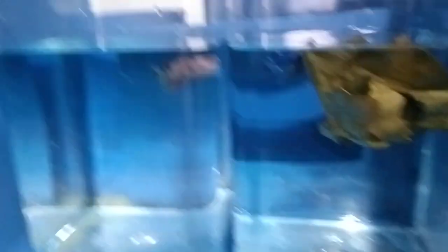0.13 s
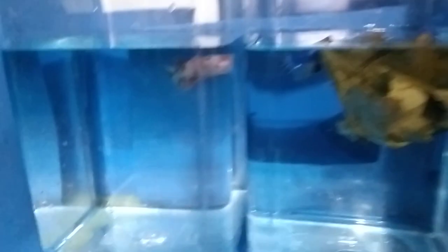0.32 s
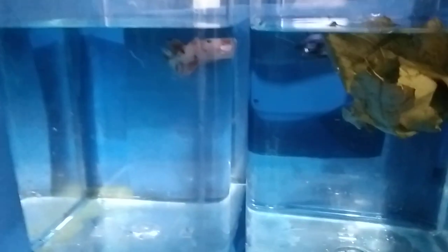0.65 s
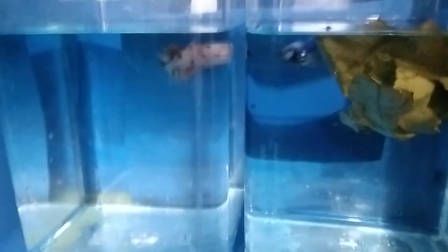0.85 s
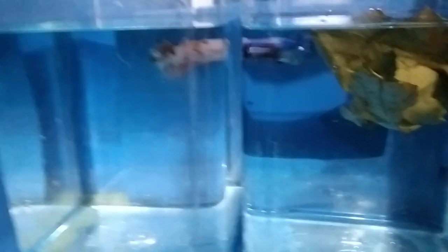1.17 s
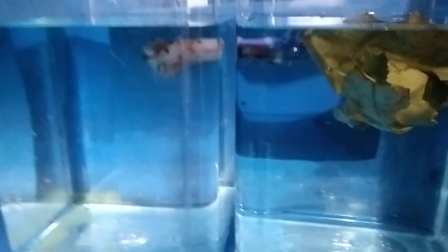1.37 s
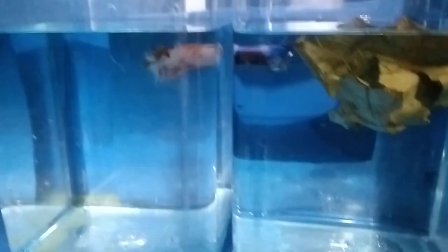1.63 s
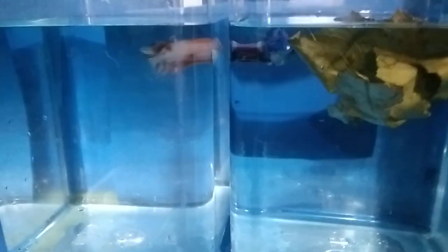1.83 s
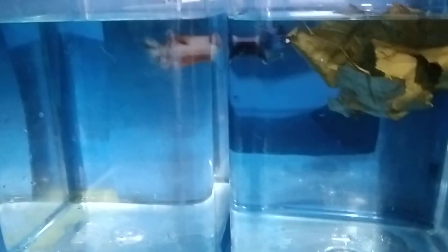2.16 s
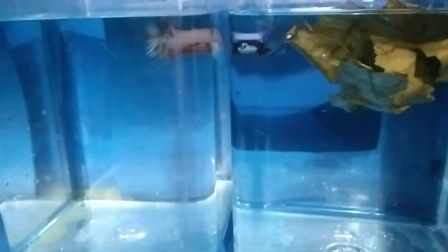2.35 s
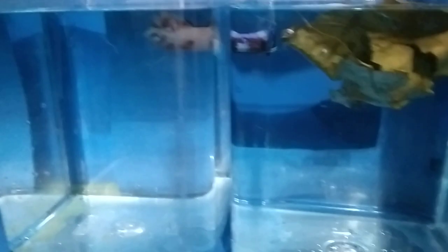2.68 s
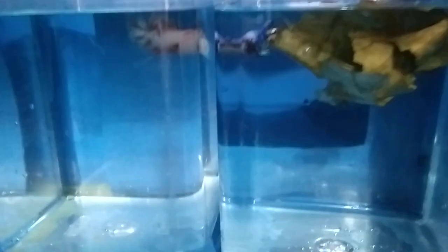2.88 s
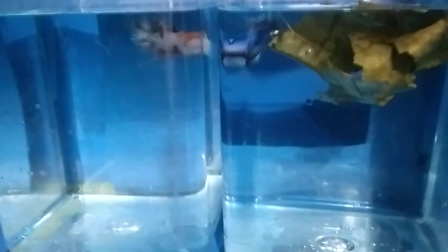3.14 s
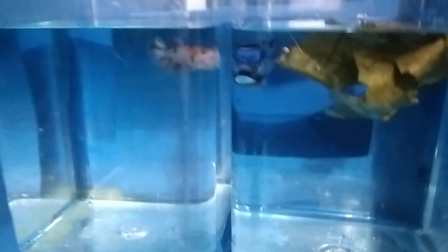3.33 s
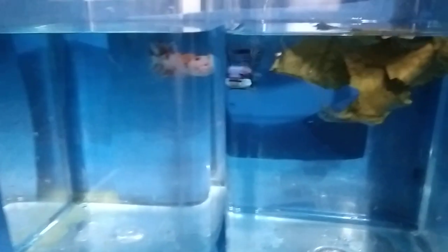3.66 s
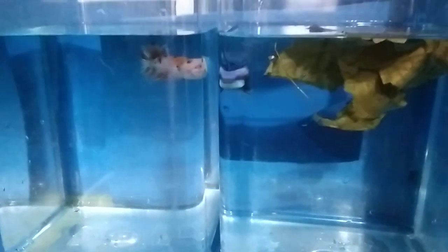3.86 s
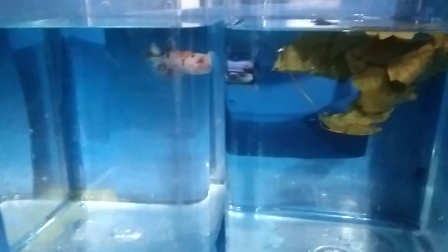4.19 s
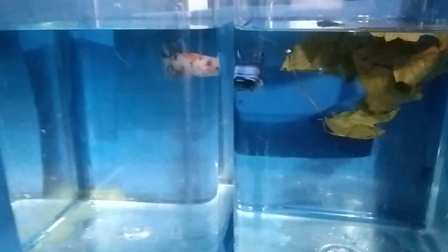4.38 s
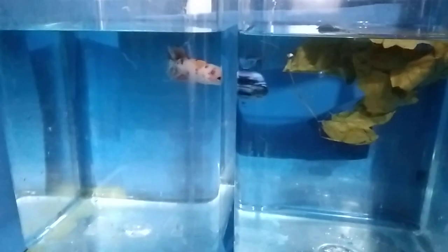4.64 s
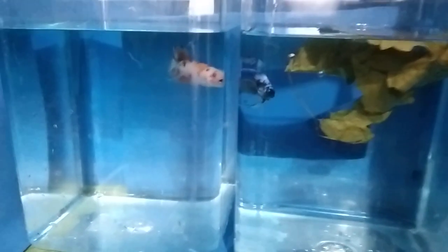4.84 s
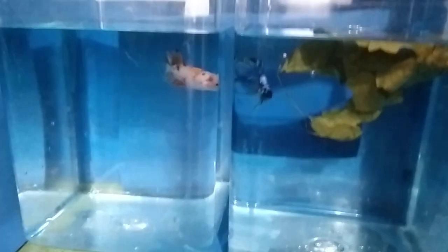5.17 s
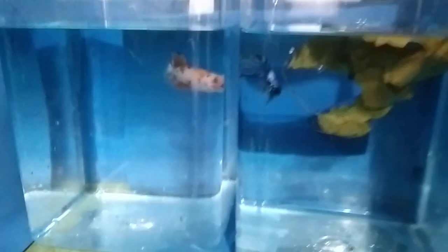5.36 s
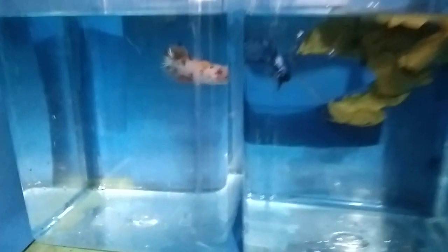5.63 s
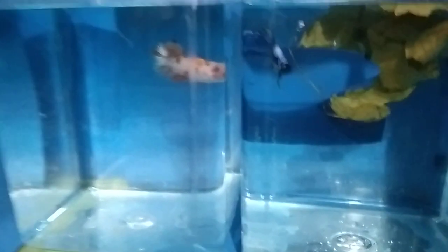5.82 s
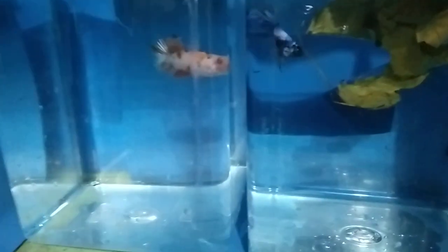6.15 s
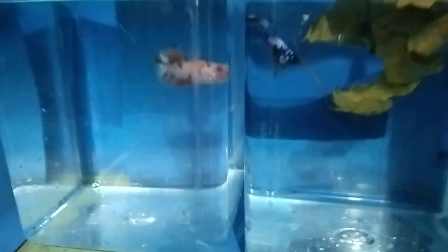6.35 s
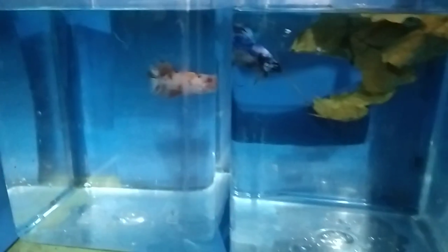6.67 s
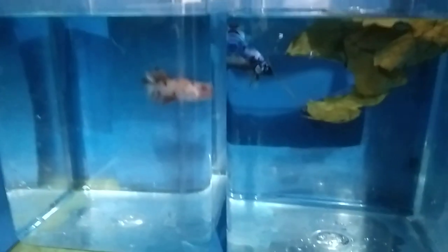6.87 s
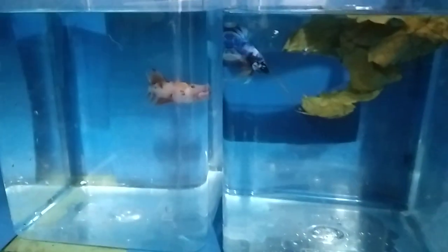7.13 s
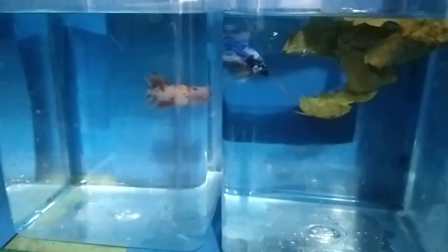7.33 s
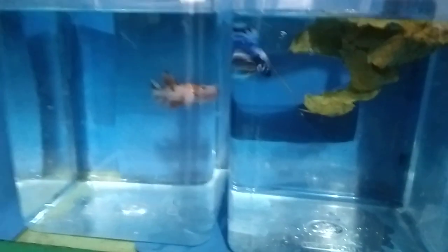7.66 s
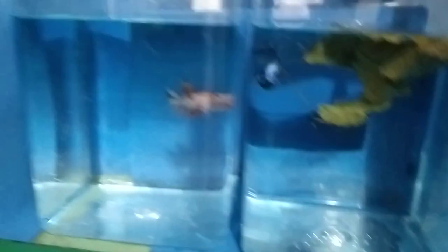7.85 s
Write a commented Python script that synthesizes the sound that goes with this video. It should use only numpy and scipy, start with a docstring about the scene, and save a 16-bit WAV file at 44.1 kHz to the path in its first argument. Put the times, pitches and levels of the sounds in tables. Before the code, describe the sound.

A quiet close phone pickup of a leaf and a water-filled plastic tank indoors. Soft hollow knocks and papery swishes gather between two and three seconds, followed by small isolated snaps, one stronger low thump after six seconds and a sharp burst of leaf crackles near the end. Underneath are gliding mid-pitched warbles with little blips, uneven airy hiss, very low room noise, and a hum only in the first half.

```python
"""Dry leaf in a small fish tank

A dry leaf is pushed into the water of a small plastic tank, close to a phone in a small room.
Leaf: cracks with short rings, swishes of band noise. Tank: knocks ring its low modes.
Background: gliding noise bands, short blips, narrow noise bursts, a thin shimmering hiss.
Two wavering low tones hum until about halfway; quiet low room noise lies beneath."""
import sys
import numpy as np
from scipy import signal
from scipy.fft import rfft, irfft
from scipy.io import wavfile
from scipy.ndimage import uniform_filter1d, map_coordinates

SR = 44100
rng = np.random.default_rng(int(sys.argv[2]) if len(sys.argv) > 2 else 0)


def wav_record(signal):
    """Record a signal, one row per channel, as 16-bit PCM in the file named by sys.argv[1]."""
    frames = np.transpose(np.atleast_2d(signal))
    bounded = np.clip(frames, -1, 1)
    # unit amplitude maps onto the largest positive 16-bit level
    quanta = np.round(bounded * 32767).astype(np.int16)
    wavfile.write(sys.argv[1], SR, quanta)


N = 353152
T = np.arange(N) / SR


def undb(db):
    """Decibels to gain."""
    return 10 ** (np.asarray(db) / 20)


def unit(x):
    """Scale to rms 1."""
    return x / np.sqrt(np.mean(x ** 2) + 1e-20)


def curves(table):
    """Each column of a table, joined by straight lines in time."""
    time_s, *columns = np.transpose(table)
    return [np.interp(T, time_s, column) for column in columns]


def colour(x, points):
    """Filter by a spectrum of (frequency [Hz], level [dB]) points, linear in log frequency."""
    hz, db = np.transpose(points)
    f = np.fft.rfftfreq(len(x), 1 / SR) + 1  # +1 avoids log(0)
    gain = undb(np.interp(np.log(f), np.log(hz), db))
    return irfft(rfft(x) * gain, len(x))


def band(x, hz, width_hz, order=2):
    """Causal band-pass of a given width around a geometric centre."""
    low = np.sqrt(hz ** 2 + (width_hz / 2) ** 2) - width_hz / 2
    edges = [low, min(low + width_hz, SR / 2 - 1000)]
    return signal.sosfilt(signal.butter(order, edges, "bandpass", fs=SR, output="sos"), x)


def walk(rate_hz):
    """Smooth random wander, rms 1, with rate_hz knots per second."""
    knots = rng.standard_normal(int(N / SR * rate_hz) + 2)
    wander = np.interp(T * rate_hz, np.arange(len(knots)), knots)
    return unit(uniform_filter1d(wander, int(SR / rate_hz / 2)))


def add(out, time_s, x):
    """Mix a sound in at a time."""
    i = max(int(time_s * SR), 0)
    out[i:i + len(x)] += x[:N - i]


def fade(t, t60_s):
    """Exponential decay, 60 dB in t60_s."""
    return np.exp(-np.log(1000) * t / t60_s)


# leaf snaps: (time [s], relative level [dB], ring [Hz])
CRACKLES = [(2.054, -22.5, 4800), (2.074, -24, 7550), (2.631, -31, 7100), (2.8455, -32.5, 7340),
            (2.96, -28.5, 7700), (4.1005, -36.5, 4250), (5.0903, -30.5, 3840), (5.853, -29, 4570),
            (6.51, -31.5, 6840), (6.636, -27.5, 6340), (6.864, -31, 6000), (7.3345, -25.5, 7000),
            (7.5335, -14, 7800), (7.5724, -12, 4440), (7.601, -15.5, 7600), (7.609, -20, 7700),
            (7.613, -20.5, 4220), (7.637, -26, 8300), (7.684, -26.5, 4250), (7.9387, -32.5, 7540)]
# leaf colour: (frequency [Hz], level [dB])
LEAF_COLOUR = [(1500, -19), (2800, -4.5), (4500, 0.5), (5700, -5.5), (7800, 3.5), (10000, -6),
               (15500, -16.5)]
CRACKLE_RING_DB = -1  # against the crack
CRACKLE_CUT_HZ = 1150  # the leaf is too small to radiate bass


def crackles():
    """Each leaf snap is a very short noise crack with a narrow-band ring and a little room decay."""
    out, t = np.zeros(N), np.arange(SR // 4) / SR
    for time_s, db, hz in CRACKLES:
        snap, air, buzz = rng.standard_normal((3, len(t)))
        crack = unit(colour(snap, LEAF_COLOUR) * fade(t, t60_s=0.007))
        ring = unit(band(buzz * fade(t, t60_s=0.012), hz, width_hz=1200))
        room = unit(colour(air, LEAF_COLOUR) * fade(t, t60_s=0.12))
        x = crack + undb(CRACKLE_RING_DB) * ring + undb(-1.0) * room
        add(out, time_s, unit(x) * undb(db - 26.0))
    return signal.sosfilt(signal.butter(4, CRACKLE_CUT_HZ, "highpass", fs=SR, output="sos"), out)


# leaf scrapes: (time [s], rise [s], centre [Hz], level [dB])
SWISHES = [(0.57, 0.07, 295, -65.5), (2.022, 0.051, 4980, -31.5), (2.05, 0.027, 910, -42.5),
           (2.157, 0.01, 4430, -41.5), (2.94, 0.024, 1240, -41.5), (2.939, 0.02, 4970, -42),
           (4.119, 0.0025, 1900, -45.5), (5.832, 0.018, 1970, -42), (7.313, 0.013, 4440, -42.5)]
SWISH_T60_S, SWISH_DAMPING = 0.41, 0.54  # t60 at 1 kHz; t60 falls with this power of the centre


def swishes():
    """The leaf scrapes as broad noise bursts; higher centres die sooner."""
    out = np.zeros(N)
    for time_s, rise_s, hz, db in SWISHES:
        t60_s = SWISH_T60_S * (1000 / hz) ** SWISH_DAMPING
        add(out, time_s, burst(hz, 1.13 * hz, rise_s, t60_s) * undb(db))
    return out


def burst(hz, width_hz, rise_s, t60_s):
    """Half a second of gritty, ragged band noise that swells and dies."""
    t = np.arange(SR // 2) / SR
    swell = np.minimum(t / rise_s, 1) ** 2
    decay = fade(np.maximum(t - rise_s, 0), t60_s)
    noise = ragged(grit(len(t), spread_db=0.5))
    return unit(band(noise, hz, width_hz, order=3)) * swell * decay


def grit(size, spread_db):
    """Noise whose strength steps randomly every 20 samples."""
    strength = np.repeat(rng.standard_normal(size // 20 + 1), 20)[:size]
    return unit(rng.standard_normal(size) * undb(spread_db * strength))


RAGGED_DB, RAGGED_STEP_HZ = 6, 108.76  # spread and spacing of the resonances


def ragged(x):
    """Give a noise burst its own random cluster of narrow resonances."""
    f = np.fft.rfftfreq(len(x), 1 / SR)
    peaks = rng.standard_normal(size=512)
    gain_db = RAGGED_DB * np.interp(f / RAGGED_STEP_HZ, np.arange(len(peaks)), peaks)
    return irfft(rfft(x) * undb(gain_db), len(x))


# blows on the tank: (time [s], relative level [dB])
KNOCKS = [(1.411, -37), (1.546, -38), (2.096, -31), (2.38, -33.5), (2.845, -29.5), (2.864, -31.5),
          (2.94, -28.5), (2.965, -31), (3.012, -36.5), (3.416, -49.5), (4.136, -52), (5.091, -44.5),
          (5.864, -44.5), (6.151, -34), (6.185, -23)]
# modes of the water-filled tank: (nominal frequency [Hz], level before tilt [dB], t60 [s])
TANK_MODES = [(129.7, -4, 0.69), (198.6, 5.5, 0.28), (261, 12, 0.2), (296.2, 3, 0.32), (469.5, -3, 0.26)]
RATTLE_DB, RATTLE_SLOPE = -7.5, 0.51  # at a table level of -37.5 dB; dB lost per dB of a harder blow


def knocks():
    """Soft blows ring the tank's low modes; the rim rattles and the room holds the boom."""
    out, t = np.zeros(N), np.arange(SR // 2) / SR
    hz, table_db, t60_s = np.transpose(TANK_MODES)[:, :, None]
    for time_s, db in KNOCKS:
        detune, phase = rng.standard_normal((2, len(TANK_MODES), 1))
        # heavier blows favour the lower modes
        mode_db = table_db + 0.038 * (db + 20) * np.log2(250 / hz)
        tones = np.sin(2 * np.pi * hz * (1 + 0.01 * detune) * t + phase)
        body = np.sum(undb(mode_db) * tones * fade(t, t60_s), axis=0)
        boom = band(rng.standard_normal(len(t)), 186, 257, order=3) * fade(t, t60_s=0.33)
        rattle = band(rng.standard_normal(len(t)), 808, 300) * fade(t, t60_s=0.36)
        rattle_db = RATTLE_DB - RATTLE_SLOPE * (db + 37.5)
        x = unit(body) + undb(-4.0) * unit(boom) + undb(rattle_db) * unit(rattle)
        attack = np.minimum(t / 0.0028, 1)
        add(out, time_s, x * attack * undb(db - 20))
    return signal.sosfilt(signal.butter(2, 62, "highpass", fs=SR, output="sos"), out)


# narrow noise bursts: (time [s], centre [Hz], level [dB])
NOISE_PATCHES = [(0.174, 6770, -50), (0.248, 5440, -52), (0.248, 1770, -61.5), (0.438, 2140, -61),
                 (0.508, 7220, -56), (0.695, 1400, -56.5), (1.02, 2950, -52), (1.138, 7600, -51),
                 (1.181, 3900, -52.5), (1.182, 1480, -59), (1.335, 8450, -52.5), (1.36, 2450, -52.5),
                 (1.457, 7360, -48.5), (1.631, 7400, -46.5), (2.52, 2100, -56.5), (2.63, 1690, -47.5),
                 (2.695, 4070, -51.5), (3.275, 2060, -49), (3.593, 8280, -53.5), (3.732, 5280, -52),
                 (3.834, 1800, -49), (3.919, 4150, -53.5), (3.994, 7880, -47.5), (4.028, 3830, -53),
                 (4.303, 8150, -58.5), (4.4, 8170, -52), (4.53, 1980, -47.5), (4.854, 7100, -43.5),
                 (5.192, 7300, -46), (5.318, 7300, -47.5), (5.468, 7160, -46), (5.659, 2040, -65),
                 (6.711, 1100, -58.5), (6.767, 6300, -45), (6.93, 2070, -47.5)]
PATCH_RISE_CYCLES = 26  # lower patches swell more slowly
PATCH_T60_S, PATCH_WIDTH = 0.34, 0.27  # width as a share of the centre


def noise_patches():
    """Narrow noise bursts that open quickly and die."""
    out = np.zeros(N)
    for time_s, hz, db in NOISE_PATCHES:
        x = burst(hz, PATCH_WIDTH * hz, PATCH_RISE_CYCLES / hz, PATCH_T60_S)
        add(out, time_s, x * undb(db))
    return out


# gliding bands: (time [s], start pitch [Hz], rise as a share of it [1/s], relative level [dB])
WARBLES = [(0, 946, -0.3, -59.5), (.246, 974, 0.24, -56.5), (.683, 1024, -.5, -51), (.944, 800, 1.5, -57),
           (1.25, 849, 1.5, -57.5), (1.729, 649, 0.3, -56), (1.909, 779, -0.3, -58.5), (2.337, 896, 2, -59),
           (2.62, 734, 0.47, -54.5), (3.168, 758, 0, -55.5), (3.621, 753, 1.4, -50.5),
           (3.786, 643, 3, -50.5), (3.98, 756, 0.76, -54), (4.272, 1027, 1.24, -56),
           (4.522, 924, 1.4, -55.5), (4.712, 774, 0, -53.5), (5.15, 641, 2.5, -50.5),
           (5.371, 861, -0.14, -55), (5.573, 767, 0.73, -51.5), (6.012, 679, -0.3, -56.5),
           (6.431, 771, 0.7, -59.5), (6.66, 587, 4, -53.5), (6.839, 796, 0.5, -50), (7.1, 710, 0.24, -57),
           (7.715, 753, 0.4, -56), (7.885, 843, -0.3, -56.5)]
# half widths as a share of the pitch; levels against the main band
WARBLE_WIDTH = 0.12
WARBLE_CORE_WIDTH, WARBLE_CORE_DB = 0.023, -0.5
WARBLE_SKIRT_WIDTH, WARBLE_SKIRT_DB = 0.31, -13.5
WARBLE_GAP_SHARE, WARBLE_LONGEST_S = 0.8, 0.28  # nominal length: share of the wait for the next, and cap
WARBLE_THROB_DB, WARBLE_THROB_HZ = 0.5, 24.16
WARBLE_BLIP_DB, WARBLE_BLIP_SPREAD = 2.5, 0.098  # level against the warble; log spread of pitch
FLOOR_DB, FLOOR_HZ, FLOOR_WIDTH_HZ = -66.5, 796, 173  # constant faint noise band, before the throb


def warbles():
    """Gliding narrow noise bands with a tonal core, a soft broad skirt and short blips."""
    floor = unit(band(rng.standard_normal(N), FLOOR_HZ, FLOOR_WIDTH_HZ, order=4))
    out = undb(FLOOR_DB) * floor
    t = np.arange(SR // 2) / SR
    waits_s = np.diff([row[0] for row in WARBLES], append=np.inf)
    for (time_s, hz, rise, db), wait_s in zip(WARBLES, waits_s):
        length_s = min(WARBLE_GAP_SHARE * wait_s, WARBLE_LONGEST_S)
        swell = np.interp(t / length_s, [0, .08, .55, 1, 1.4], [0.079, 0.94, 0.63, 0.37, 0])
        track_hz = hz * (1 + rise * t)
        main = sliding(track_hz, WARBLE_WIDTH * hz)
        core = sliding(track_hz, WARBLE_CORE_WIDTH * hz)
        skirt = sliding(1.2 * track_hz, WARBLE_SKIRT_WIDTH * hz)
        x = main + undb(WARBLE_CORE_DB) * core + undb(WARBLE_SKIRT_DB) * skirt
        add(out, time_s, unit(x) * swell * undb(db))
        delays_s = rng.random(size=5) * length_s
        for delay_s, detune in zip(delays_s, rng.standard_normal(size=5)):
            x = blip(hz * (1 + rise * delay_s) * np.exp(WARBLE_BLIP_SPREAD * detune))
            add(out, min(time_s + delay_s, T[-1]) - len(x) / SR / 2, x * undb(db + WARBLE_BLIP_DB))
    return out * undb(WARBLE_THROB_DB * walk(WARBLE_THROB_HZ))


def sliding(hz, half_width_hz):
    """A narrow band of noise, rms 1, whose centre follows a pitch track."""
    phase = 2 * np.pi * np.cumsum(hz) / SR
    lowpass = signal.butter(4, half_width_hz, fs=SR, output="sos")
    noise = signal.sosfilt(lowpass, rng.standard_normal((2, 2 * len(hz))))
    a, b = noise[:, len(hz):]  # drop the filter's start-up
    return unit(a * np.cos(phase) + b * np.sin(phase))


def blip(hz):
    """A tenth of a second with a nearly pure tone that swells at its middle and rises a little."""
    t = np.arange(-SR // 20, SR // 20) / SR
    tone = np.sin(2 * np.pi * np.cumsum(hz * (1 + 1.44 * t)) / SR)
    return tone * np.exp(-(t / 0.011) ** 2)


# clear tonal blips: (time [s], relative level [dB])
CLEAR_BLIPS = [(1.52, -46), (1.77, -42), (2.28, -45), (2.77, -44.5), (3.21, -44), (5.82, -44), (7.15, -48),
               (7.63, -46), (7.74, -48)]
CLEAR_BLIP_HZ = 753  # mean pitch


def clear_blips():
    """A few clear short tonal blips of nearly equal pitch."""
    out = np.zeros(N)
    for time_s, db in CLEAR_BLIPS:
        x = blip(CLEAR_BLIP_HZ * (1 + 0.017 * rng.standard_normal()))
        add(out, time_s - len(x) / SR / 2, x * undb(db + 1))
    return out


# middle range: (time [s], relative level [dB])
HISS_MIDDLE = [(0, -87), (.55, -87), (.8, -59.5), (.97, -77), (1.6, -66), (1.88, -53), (2, -70),
               (2.17, -55), (2.36, -63), (2.48, -76), (2.75, -68.5), (3.08, -55.5), (3.24, -81),
               (3.43, -59), (3.72, -79.5), (4.48, -81.5), (4.76, -77.5), (4.9, -57.5), (5.25, -88),
               (5.38, -54.5), (5.8, -91), (6.1, -62), (6.52, -59), (6.72, -77), (7, -54.5), (7.22, -87),
               (7.36, -60.5), (7.61, -57.5), (7.85, -73.5), (8, -54)]
# treble: (time [s], relative level [dB])
HISS_TREBLE = [(0, -64), (.13, -80), (.44, -84), (.65, -57), (.97, -72.5), (1.25, -67.5), (1.45, -66.5),
               (1.66, -58.5), (1.89, -51), (1.98, -58.5), (2.12, -54), (2.35, -55.5), (2.5, -66.5),
               (2.72, -55.5), (2.82, -67), (2.88, -58.5), (3.12, -57.5), (3.25, -71.5), (3.45, -54),
               (3.72, -80), (3.97, -82), (4.11, -51.5), (4.29, -88.5), (4.46, -64), (5.04, -56.5),
               (5.2, -59), (5.58, -64), (5.8, -79), (5.88, -51.5), (6.04, -70), (6.18, -50.5), (6.6, -55),
               (6.95, -55), (7.15, -56.5), (7.45, -56.5), (7.682, -52.5), (7.82, -61), (8, -51)]
# brightness: (time [s], gain of the top hiss, half of it for the upper hiss [dB])
HISS_BRIGHTNESS = [(.65, 1), (1.35, 6.5), (1.9, -1.5), (2.45, 3.5), (2.9, 7), (3.3, 3), (3.85, -9),
                   (4.7, 8.5), (5, -0.5), (5.25, -2), (5.6, 4.5), (6.4, -11), (6.601, 1), (7.25, 0.5),
                   (8, -2)]
# colour of the upper and top hiss: (frequency [Hz], level [dB])
HISS_COLOUR = [(7800, 1), (15500, -19)]
HISS_DB = -0.5
UPPER_HISS_DB, TOP_HISS_DB = -1, -8  # against the lower treble, before brightness
CRACKLING_DB, CRACKLING_HZ = 2.3, 259  # fast unevenness of the treble
SURGE_DB, SURGE_HZ = 2.16, 45.56  # slower unevenness of the whole hiss


def hiss():
    """Shimmering noise in four ranges that surge, brighten and fall nearly silent."""
    noise = shimmer()
    coloured = colour(noise, HISS_COLOUR)
    middle = hiss_range(noise, 1980, 1500)
    lower_treble = hiss_range(noise, 4200, 3100)
    upper_hiss = hiss_range(coloured, 7600, 3600)
    top_hiss = hiss_range(coloured, 12300, 6300)
    middle_db, = curves(HISS_MIDDLE)
    treble_db, = curves(HISS_TREBLE)
    bright_db, = curves(HISS_BRIGHTNESS)
    treble = lower_treble + undb(UPPER_HISS_DB + bright_db / 2) * upper_hiss
    treble = treble + undb(TOP_HISS_DB + bright_db) * top_hiss
    crackling = unit(undb(CRACKLING_DB * walk(CRACKLING_HZ)))
    surge = undb(HISS_DB + SURGE_DB * walk(SURGE_HZ))
    return (undb(middle_db) * middle + undb(treble_db) * treble * crackling) * surge


def hiss_range(x, hz, width_hz):
    """One band with its slow level evened out so that a curve can set it."""
    x = band(x, hz, width_hz, order=5)
    return x / np.sqrt(uniform_filter1d(x ** 2, size=5000) + 1e-12)


SHIMMER_DB, SHIMMER_FALL = 7, 0.3  # spread at 4 kHz; power by which it shrinks above 1.5 kHz
SHIMMER_STEP_HZ, SHIMMER_STEP_S = 260, 0.05  # spacing of the random gains


def shimmer():
    """Noise whose narrow resonances fade in and out at random, less deeply toward the treble."""
    f, t, z = signal.stft(rng.standard_normal(N), SR, nperseg=1024)
    rows, cols = np.meshgrid(f / SHIMMER_STEP_HZ, t / SHIMMER_STEP_S, indexing="ij")
    field = map_coordinates(rng.standard_normal(size=(128, 256)), [rows, cols], order=1)
    depth_db = SHIMMER_DB * (4000 / np.maximum(f, 1500)) ** SHIMMER_FALL
    return signal.istft(z * undb(depth_db[:, None] * field), SR)[1][:N]


# lower tone: (time [s], pitch [Hz], relative level [dB])
HUM_LOWER = [(0, 98, -44.5), (.8, 96, -47), (1.25, 100, -48.5), (1.45, 86, -46), (2.3, 100, -48),
             (2.8, 98, -52), (3.7, 100, -63), (4.05, 96, -51), (4.35, 98, -73)]
# upper tone: (time [s], relative level [dB])
HUM_UPPER = [(.5, -31.5), (.9, -41.5), (2.9, -75.5)]
HUM_UPPER_HZ = 121.3  # mean pitch


def hum():
    """Two low tones beat over a little rumble; one wavers in level, the other in pitch."""
    lower_hz, lower_db = curves(HUM_LOWER)
    upper_db, = curves(HUM_UPPER)
    waver = np.interp(T, [.5, .75], [.15, .45])
    lower = np.sin(2 * np.pi * np.cumsum(lower_hz) / SR) * (1 + waver * walk(21.84))
    upper_hz = HUM_UPPER_HZ + 30 * waver * walk(16)
    upper = np.sin(2 * np.pi * np.cumsum(upper_hz) / SR)
    rumble = waver * unit(band(rng.standard_normal(N), 86.8, 82.2, order=3))
    dying = np.interp(T, [4.25, 4.4], [1, 0])
    low = undb(lower_db + 0.5) * (lower + undb(2.5) * rumble)
    return dying * (low + undb(upper_db - 16.5) * upper)


# room colour: (frequency [Hz], level [dB])
ROOM_COLOUR = [(25, -24), (97, 4.5), (160, -11.5), (450, -14), (900, -38.5)]
ROOM_DB = -75.5  # rms


def room_tone():
    """Very quiet low room noise."""
    return unit(colour(rng.standard_normal(N), ROOM_COLOUR)) * undb(ROOM_DB)


def scene():
    """All sources at one microphone."""
    leaf_and_tank = crackles() + swishes() + knocks()
    background = noise_patches() + warbles() + clear_blips() + hiss() + hum() + room_tone()
    return (leaf_and_tank + background)[None]


TOP_HZ = 15800


def record(dry):
    """The phone cuts the top with a steep low-pass."""
    return signal.sosfilt(signal.ellip(10, .2, 80, TOP_HZ, fs=SR, output="sos"), dry)


dry = scene()
out = record(dry)
wav_record(out)
```